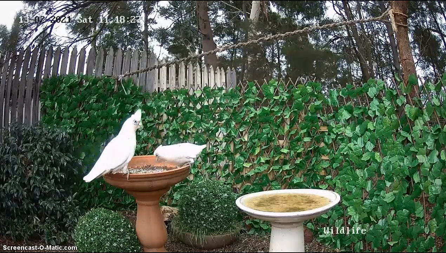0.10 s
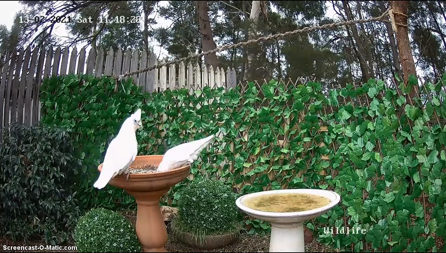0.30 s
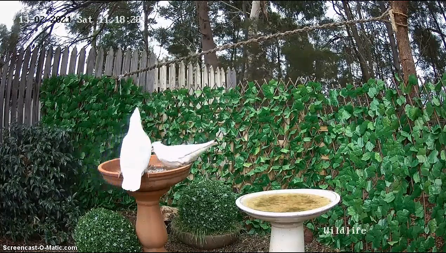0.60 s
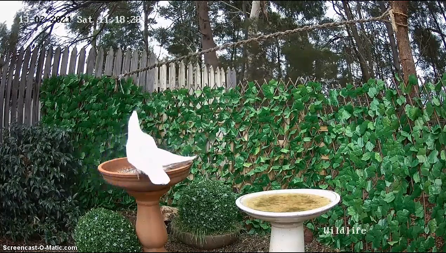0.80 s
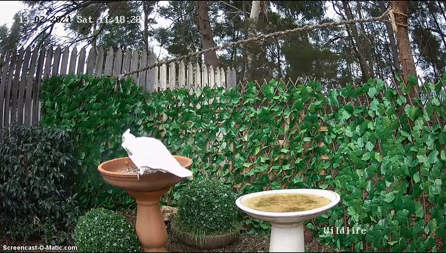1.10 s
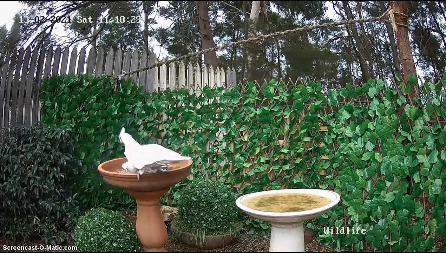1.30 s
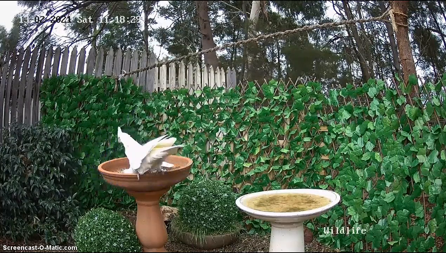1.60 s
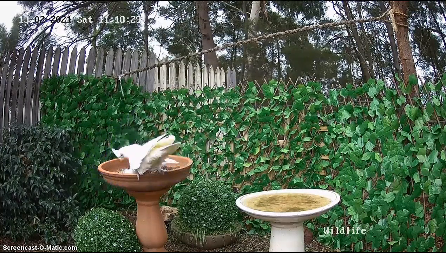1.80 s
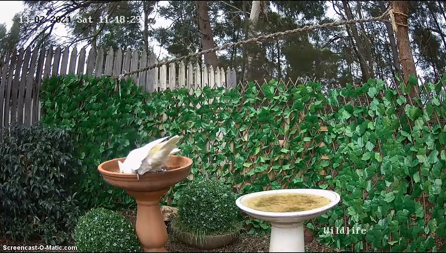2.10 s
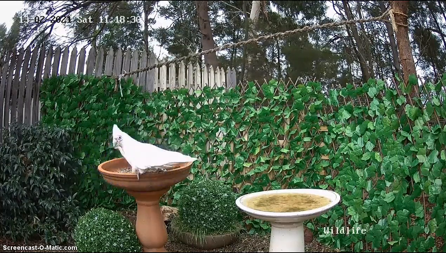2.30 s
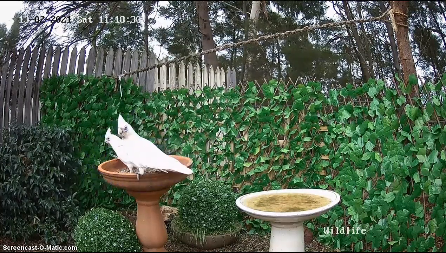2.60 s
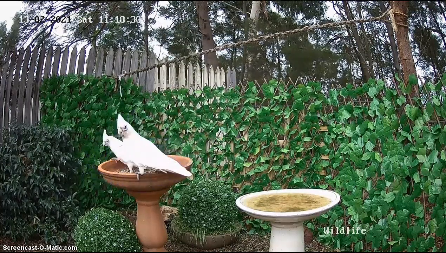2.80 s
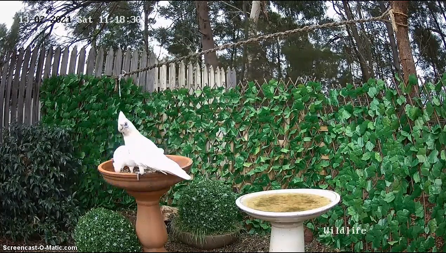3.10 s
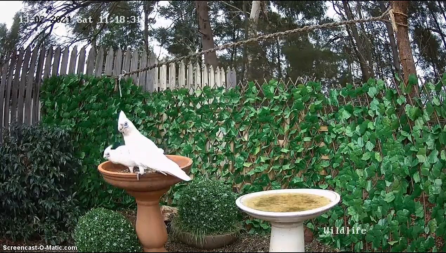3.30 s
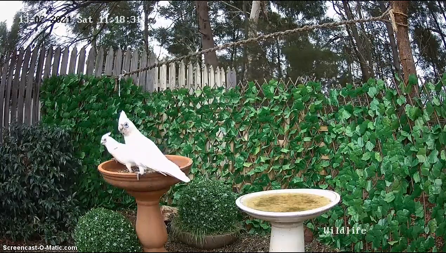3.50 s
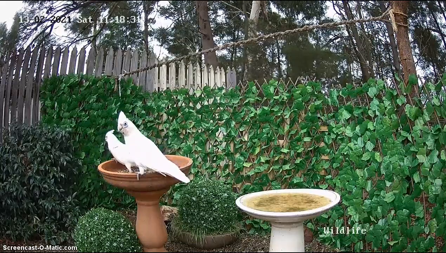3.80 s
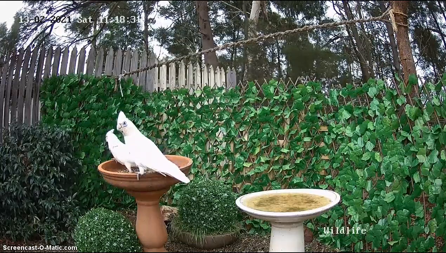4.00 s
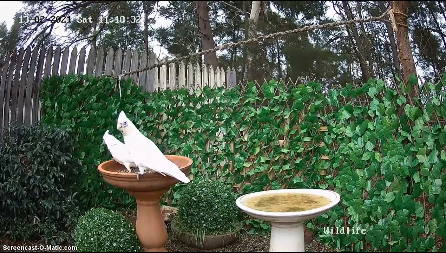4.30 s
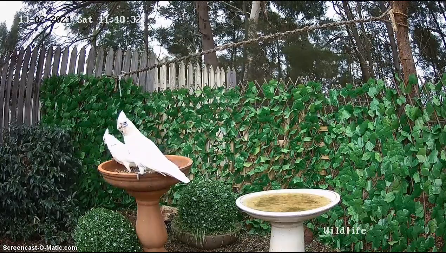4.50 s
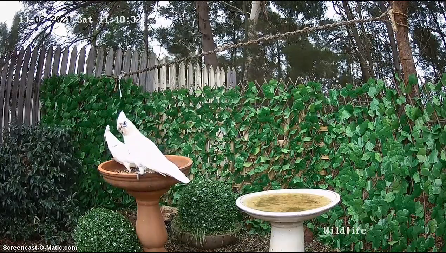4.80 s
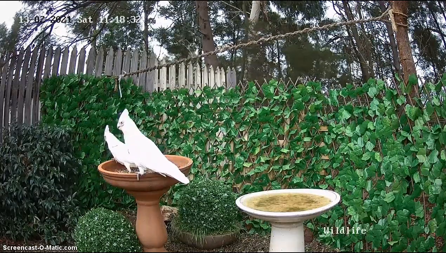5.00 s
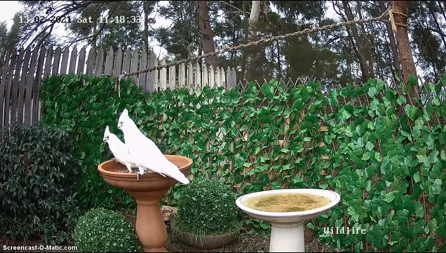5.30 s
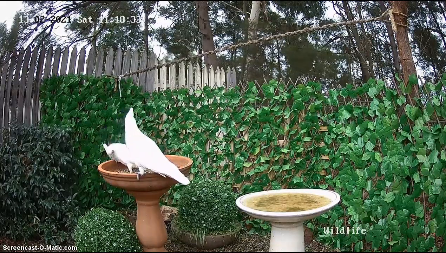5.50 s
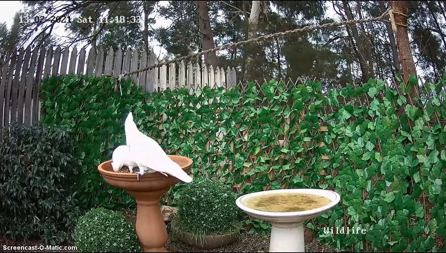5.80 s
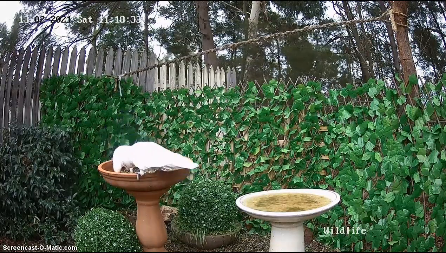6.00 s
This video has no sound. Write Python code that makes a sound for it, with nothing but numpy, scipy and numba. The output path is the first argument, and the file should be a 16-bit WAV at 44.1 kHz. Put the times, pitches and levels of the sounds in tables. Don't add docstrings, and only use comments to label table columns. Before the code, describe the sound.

Garden birds heard through a small tinny loudspeaker: two-note whistles, faint peeps and a single rasping cockatoo scream, with room hum and hiss.

```python
import sys
import numpy as np
from scipy import signal
from scipy.fft import rfft, irfft
from scipy.io import wavfile
from scipy.ndimage import uniform_filter1d
from numba import njit

SR = 44100
rng = np.random.default_rng(int(sys.argv[2]) if len(sys.argv) > 2 else 0)


def undo_db(level):
    steps = np.asarray(level, float) / 20
    return 10 ** steps


def dump(signal):
    limited = np.clip(np.atleast_2d(signal).T, -1, 1)
    pcm = np.round(limited * 32767).astype(np.int16)
    wavfile.write(sys.argv[1], SR, pcm)


N = 272979

# [t/s, f/Hz, first partial level/dB, third partial level/dB]
LOCKED_VOICE = [(2.08, 728, -60, -81), (2.09, 767.1, -47.5, -45), (2.132, 790.0, -50, -26),
                (2.164, 785, -30, -25.5), (2.198, 778.3, -30, -22), (2.23, 774, -35.5, -26)]
# [multiple of f, level under the third/dB, share that follows the first]
OTHER_PARTIALS = [(2, -3.5, 0.3), (4, -5, 0.063), (5, -8, 0.27)]
# [t/s, half length/s, level/dB]
RELAPSES = [(2.223, 0.0045, 0), (2.238, 0.0069, -3.5), (2.264, 0.0057, -15), (2.304, 0.0028, -6.5)]


def locked_voice():
    out = np.zeros(N)
    last_s, *last_row = LOCKED_VOICE[-1]
    i, (hz, first_db, third_db) = curve(LOCKED_VOICE + [(2.32, *last_row)])
    t = i / SR
    gate = np.clip((last_s - t) / 0.036, 0, 1)
    for s, half, db in RELAPSES:
        gate = gate + undo_db(db) * np.exp(-((t - s) / half) ** 2)
    phase = 2 * np.pi * np.cumsum(hz * (1 + 0.0073 * walk(150, len(i)))) / SR
    stack = undo_db(first_db) * np.sin(phase) + undo_db(third_db) * np.sin(3 * phase)
    for k, db, share in OTHER_PARTIALS:
        partial_db = third_db + db + share * (first_db - third_db)
        stack += undo_db(partial_db) * np.sin(round(k) * phase + k ** 2)
    out[i] = np.sqrt(2) * gate * stack
    return out


# [t/s, level/dB, beak opening as treble level/dB, whine against the level/dB]
HARSH_VOICE = [(2.066, -44.5, -9, -15), (2.11, -33, 4.5, -8), (2.125, -47.5, -8.5, -6),
               (2.215, -24.5, -5.5, -10.5), (2.27, -25, 1, -3), (2.45, -24, -2, -4),
               (2.58, -27.5, 2.5, -11), (2.65, -34, -2.5, -16), (2.7, -48.5, -6.5, -28)]
# [f/Hz, width/Hz, level/dB]
THROAT = [(420, 250, -26), (748, 61, -15.5), (1091, 17, -12.5), (1337, 33, -12.5), (1604, 55, -11.5),
          (1806, 70, -12.5), (2342, 42, -5), (2580, 35, -4), (3030, 140, -15), (3569, 48, 0),
          (4000, 42, -14)]
# [f/Hz, level per Hz/dB]
HARSH_BED = [(88, -63.5), (150, -18), (659, -19.5), (738, -7), (941, -20.5), (1570, -36.5), (1940, -16.5),
             (2340, -7.5), (2730, -10), (3530, -4), (4500, -34.5), (5850, -62), (9900, -120)]


def harsh_voice():
    out = np.zeros(N)
    i, (db, open_db, whine_db) = curve(HARSH_VOICE)
    db = db - 12 * np.exp(-(i - i[0]) / (.003 * SR))
    whine_hz = 3598 - 79.7 / 2 * (1 + np.tanh((i / SR - 2.49) / 0.038))
    chance = rng.standard_normal((len(i) // 20, 2)).T
    spread = .1 * undo_db(6 * walk(SR / 12, len(chance[0])))
    at = np.cumsum(SR / 745 * np.exp(chance[0] * spread))
    size = undo_db(2.4 * chance[1] + 1.7 * (-1) ** np.arange(len(at)))
    inside = at < len(i)
    slaps = np.bincount(at[inside].astype(int), size[inside], len(i))
    breath = .5 * rng.standard_normal(len(i))
    drive = (level(slaps - slaps.mean(), 0) + breath) * undo_db(0.66 * walk(120, len(i)))
    voice = level(modes(drive, THROAT), 0) + level(colour(drive, HARSH_BED), -6.5)
    treble = svf(voice, 3500., 1500.)
    opened = level(voice + (undo_db(open_db) - 1) * treble, 0)
    out[i] = undo_db(db) * opened + whine(whine_hz, db + whine_db)
    return out


def whine(hz, db, throb_hz=155, depth=0.6):
    size = len(hz)
    throb = 2 * np.pi * np.cumsum(throb_hz * (1 + .12 * walk(40, size))) / SR
    phase = 2 * np.pi * np.cumsum(hz * (1 + .006 * walk(200, size))) / SR
    lower = depth * undo_db(3.6 * walk(50, size)) * np.sin(phase - throb)
    upper = 0.26 * np.sin(phase + throb)
    return np.sqrt(2) * undo_db(db + 3.2 * walk(70, size)) * (np.sin(phase) + lower + upper)


def screech():
    return locked_voice() + harsh_voice()


def whistle(long, short):
    s, length, hz, db, falter_db = long
    keen = int(short[4] > 0)
    scoop_hz, scoop_s, attack_s, attack_db = 86, 0.0288, 0.0078, -3
    sag_hz = (45.5, 63.7)[keen]
    flick_hz, flick_s, flick_db = (125, 312)[keen], (.018, .027)[keen], (-17, -12)[keen]
    falter_hz = 4 * falter_db
    end = s + length
    rows = [(s, hz - scoop_hz, db - falter_db + attack_db),
            (s + attack_s, hz - 0.76 * scoop_hz, db - 0.83 * falter_db),
            (s + scoop_s, hz - 0.17 * scoop_hz, db - 0.32 * falter_db),
            (s + 0.51 * length, hz - falter_hz, db - falter_db),
            (s + .8 * length, hz - .4 * sag_hz, db - 0.16 * falter_db),
            (end, hz - sag_hz + 1.3 * falter_hz, db),
            (end + flick_s / 2, hz + 0.74 * flick_hz, db - .3 * abs(falter_db)),
            (end + flick_s, hz + flick_hz, db + flick_db)]
    long_rows = []
    for at, f, row_db in rows:
        second_db = row_db + (-16, -12)[keen] - 2 * ((at - s) / length - .5)
        second_db += .6 * falter_db if at <= end else -3
        long_rows.append((at, f, row_db, second_db))

    s, length, hz, db, bend_hz = short
    start_db = db - (0, 5)[keen]
    end = s + length
    rows = [(s, hz, start_db + attack_db),
            (s + attack_s / 2, hz, start_db),
            (s + 0.56 * length, hz + (.5 + keen / 2) * bend_hz, db),
            (end, hz + bend_hz, db),
            (end + .015, hz + bend_hz - 170, db - 25)]
    short_rows = [(*row, row[2] + (-32, -19)[keen]) for row in rows]
    return song(long_rows, flutter_db=.8, broken_db=4) + song(short_rows, flutter_db=.4, broken_db=5)


# [t/s, length/s, f/Hz, level/dB, falter midway/dB]
LONG_NOTES = [(-.06, 0.13, 1430, -43.5, 0), (0.568, .116, 1417, -40.5, -2), (2.842, 0.093, 1485, -43, 13),
              (5.573, .118, 1448, -41.5, 1)]
# [t/s, length/s, f/Hz, level/dB, bend/Hz]
SHORT_NOTES = [
    (0.108, 0.041, 1531, -32.5, 91),
    (.726, 0.032, 1545, -30, -40),
    (2.979, 0.028, 1622, -35.5, 35),
    (5.73, 0.035, 1578, -34, -50),
]
# [t/s, f/Hz, level/dB]
GLIDE = [(2.583, 1310, -39), (2.622, 1428, -37), (2.643, 1700, -38), (2.661, 1340, -35.5),
         (2.684, 1150, -56), (2.712, 770, -49), (2.724, 560, -68), (2.736, 455, -47), (2.775, 467, -52)]


def near_birds():
    whistles = sum(map(whistle, LONG_NOTES, SHORT_NOTES))
    return tail(whistles + song(GLIDE, flutter_db=1.0, wobble=0.0074), .3, -30)


# [t/s, held/s, f/Hz, level/dB, drops to f/Hz]
SHARP_NOTES = [
    (1.59, 0.016, 4082, -32.5, 2650),
    (1.617, 0.013, 3400, -35, 3080),
    (1.636, .01, 3000, -38, 2360),
]


def sharp():
    out = song([(1.563, 2107, -64), (1.563 + .018, 4300, -34)], flutter_db=2.5, wobble=.01)
    step_db = -17
    for s, held, hz, db, to_hz in SHARP_NOTES:
        end, fall_s = s + held, (hz - to_hz) / 95000
        rows = [(s, .97 * hz, db - 0.5),
                (s + 0.57 * held, hz, db),
                (end, hz, db),
                (end + .6 * fall_s, .4 * hz + 0.61 * to_hz, db + .3 * step_db),
                (end + fall_s, to_hz, db + step_db)]
        out += song(rows, flutter_db=2.5, wobble=.01)
    return out


def chirp(s, held_db, tail_db, tail_s):
    lead_hz, held_hz, tail_hz = 3770, 3400, 2280
    lead_s, held_s, fall_s = .05, .022, .022
    lead_db = held_db - 10
    rows = [(s - held_s - lead_s, lead_hz, lead_db),
            (s - 1.86 * held_s, (lead_hz + held_hz) / 2, lead_db),
            (s - held_s, held_hz, held_db),
            (s, held_hz, held_db),
            (s + .4 * fall_s, 1.2 * tail_hz, tail_db + 1),
            (s + fall_s, 1.04 * tail_hz, tail_db),
            (s + fall_s + tail_s / 3, tail_hz, tail_db),
            (s + fall_s + tail_s, .97 * tail_hz, tail_db - 4)]
    return song(rows, flutter_db=3.5)


def peep(s, db, hz):
    rows = [(s - .006, hz, db - 16), (s + .004, hz, db - 5), (s + .018, .99 * hz, db - 17)]
    return song(rows, wobble=.01)


def faint_note(s, length, hz, db):
    rows = [(s, hz, db), (s + length / 2, hz, db), (s + length, hz, db + 1)]
    return song(rows, flutter_db=3.5, wobble=0.032)


# [drop t/s, held level/dB, tail level/dB, tail/s]
CHIRPS = [
    (5.028, -52.5, -54.5, 0.0084),
    (5.435, -51, -56, .05),
    (6.137, -72, -58.5, 0.066),
]
# [t/s, peak level/dB, f/Hz]
PEEPS = [(0.5077, -54, 3425), (0.847, -49.5, 3000), (1.3319, -36, 3458), (1.3865, -54, 3400),
         (1.476, -38.5, 3000), (1.7894, -62.5, 3400), (4.8544, -54, 2710), (4.875, -43, 2603),
         (5.2315, -50, 2590), (5.254, -44, 2580), (5.2758, -47.5, 2670)]
# [t/s, length/s, f/Hz, level/dB]
FAINT_NOTES = [(3.979, 0.12, 2700, -67), (4.48, .1, 2700, -68), (4.82, .08, 2260, -64.5),
               (5.222, 0.084, 2280, -61)]


def far_birds():
    far = sharp()
    for play, table in ((chirp, CHIRPS), (faint_note, FAINT_NOTES), (peep, PEEPS)):
        far = far + sum(play(*row) for row in table)
    far = far + 0.4 * np.roll(far, int(.0045 * SR)) + 0.19 * np.roll(far, int(0.029 * SR))
    return tail(far, .5, -14)


# [t/s, peak level/dB, low part level/dB]
TICKS = [(0.0517, -44, -16), (0.0652, -36, 2), (0.7542, -43.5, 2), (0.847, -43, 3), (1.3142, -44, -19),
         (1.5569, -41, -31), (2.9931, -37.5, -13), (3.026, -43.5, -8), (3.3855, -46, -7), (3.5029, -54, -5),
         (3.8357, -36.5, -5), (4.127, -44, -15), (4.1705, -50, -9), (4.1929, -50, -7), (5.1746, -41, -23),
         (5.4594, -38, -8), (5.678, -45, -1), (5.8002, -40.5, 5), (5.9544, -49, -4)]


def ticks():
    out, t = np.zeros(N + 2000), np.arange(2000) / SR
    for s, db, low_db in TICKS:
        crack = modes(rng.standard_normal(len(t)) * np.exp(-t / 0.0039), SPEAKER)
        crack = colour(crack, [(900, low_db - 23), (1600, low_db), (2700, 0), (4400, 0)])
        start = int(s * SR)
        out[start:start + len(t)] += undo_db(db) * crack / np.abs(crack).max()
    return tail(out[:N], 0.29, -9.5)


# [t/s, half length/s, level/dB]
GUSTS = [(0, 0.16, -61), (.85, 0.35, -67), (1.39, .05, -61), (1.47, 0.033, -58), (1.6, 0.12, -58.5),
         (2.7, 0.16, -53), (5.15, 0.66, -60.5), (6, .4, -69)]


def leaves():
    grains = rng.standard_normal(N) * undo_db(1.5 * walk(60, N))
    return swells(-68, GUSTS) * level(modes(grains, SPEAKER[1:]), 0)


# [t/s, half length/s, level/dB]
PASSES = [
    (2.7, 0.28, -70),
    (5.05, 0.61, -59.5),
]


def traffic():
    rumble = svf(svf(rng.standard_normal(N), 1684.0, 350.0), 1684.0, 350.0)
    return swells(-67.5, PASSES) * level(rumble, 0)


# [f/Hz, width/Hz, level/dB]
SPEAKER = [(1680, 210, 2.5), (2292, 110, -0.5), (2650, 130, -4.5), (3000, 69, 4), (3466, 266, 2.5),
           (3850, 840, -4)]


def tail(x, t60, db):
    t = np.arange(SR // 2) / SR
    noise = rng.standard_normal(len(t))
    echo = (noise + modes(noise, SPEAKER)) * undo_db(-60 * t / t60) * np.minimum(t / .02, 1)
    return x + signal.fftconvolve(x, echo * undo_db(db) / np.linalg.norm(echo))[:N]


def camera(yard):
    camera_hz = 8000
    leak = [(20, 1.0), (3700, -1.5), (4000, -3), (4300, -10.0),
            (4480, -40), (4560, -82), (20000, -86.5)]
    mirror = 2 * np.cos(2 * np.pi * camera_hz * np.arange(N) / SR)
    rounded = np.tanh(3.51 * yard) / 3.515
    taken = signal.sosfilt(signal.butter(10, 4200, fs=SR, output="sos"), rounded)
    return colour(taken * (1 + mirror), leak)


# [t/s, half length/s, level/dB, low part level/dB]
STROKES = [(0, .04, -77.5, -6), (.45, .4, -85, 4), (1.64, 0.19, -71, -1.5), (2.034, 0.076, -66, -7),
           (2.15, 0.069, -68, 1), (2.447, 0.16, -66.5, -3.5), (2.704, 0.088, -68, -5), (2.93, .07, -66, -4),
           (3.16, .08, -69.5, -5), (3.414, 0.078, -67, -2.5), (3.68, .08, -71.5, -7),
           (3.888, .05, -66.5, -9), (4.12, 0.077, -66, -4.5), (4.51, 0.21, -66.5, 1)]


def desk():
    resting_db = -91
    fine = rng.standard_normal((2, N)) * undo_db(0.97 * walk(300, N))
    high = level(svf(svf(fine[0], 9900., 4500.), 9900., 4500.), 0)
    low = level(svf(svf(fine[1], 5900., 4000.), 5900., 4000.), 0)
    high_strokes = [(s, half, db) for s, half, db, low_db in STROKES]
    low_strokes = [(s, half, db + low_db) for s, half, db, low_db in STROKES]
    return swells(resting_db, high_strokes) * high + swells(resting_db + 2.5, low_strokes) * low


# [f/Hz, width/Hz, level/dB]
FAN = [(112.7, 17.6, -57), (208.2, 13, -59.5), (467, 15, -64.5), (621, 15, -68.5), (790, 84, -64)]


def fan():
    hum = np.zeros(N)
    for hz, width, db in FAN:
        band = svf(rng.standard_normal(N), 1. * hz, 1. * width)
        hum += level(band * undo_db(1.4 * walk(3.016, N)), db)
    motor_hz = 122.8 * (1 + 0.0193 * walk(6, N))
    motor = np.sin(2 * np.pi * np.cumsum(motor_hz) / SR) * undo_db(1.6 * walk(4, N))
    return hum + level(motor, -56.5)


# [f/Hz, level per Hz/dB]
ROOM_AIR = [(12, -36.5), (20, -3.5), (85, -7.5), (112, -12.5), (202, -4), (245, -17.5), (282, -8.5),
            (520, -20), (632, -14), (883, -23.5), (960, -18.5), (1420, -24), (1630, -24), (2040, -33),
            (15600, -41.5)]


def room_air():
    air = colour(rng.standard_normal(N), ROOM_AIR)
    t = np.arange(N) / SR
    lull_db = -4.5 * np.exp(-((t - 1.9) / 0.97) ** 2)
    draught_db = -0.5 + .5 * t + lull_db
    air = air + (undo_db(draught_db) - 1) * svf(air, 770.0, 1100.)
    for hz in 60 * 2. ** np.arange(5):
        air = air + (undo_db(.9 * walk(4, N)) - 1) * svf(air, hz, .7 * hz)
    return level(air, -49.5 - 2.5)


def song(table, flutter_db=5.0, wobble=0.004, broken_db=1):
    out = np.zeros(N)
    i, (hz, db, *second_db) = curve(table)
    phase = 2 * np.pi * np.cumsum(hz * (1 + wobble * walk(150, len(i)))) / SR
    tone = undo_db(db) * np.sin(phase)
    broken = walk(70.7, len(i))
    for d in second_db:
        third = undo_db(-7) * np.sin(3 * phase) * (hz < 1430)
        tone += undo_db(d + broken_db * (broken - broken.mean())) * (np.sin(2 * phase) + third)
    count = np.arange(len(i))
    edge = np.minimum(np.minimum(count, count[::-1]) / (.002 * SR), 1)
    flutter = walk(91, len(i))
    out[i] = np.sqrt(2) * tone * edge * undo_db(flutter_db * (flutter - flutter.mean()))
    return out


def swells(rest_db, table):
    t = np.arange(N) / SR
    power = undo_db(rest_db) ** 2
    for s, half, db in table:
        power = power + (undo_db(db) * np.exp(-((t - s) / half) ** 2)) ** 2
    return np.sqrt(power)


def level(x, db):
    return x * undo_db(db) / np.sqrt(np.mean(x ** 2))


def curve(table):
    s, *columns = np.transpose(table)
    i = np.arange(max(int(s[0] * SR), 0), min(int(s[-1] * SR), N))
    return i, [np.interp(i / SR, s, c) for c in columns]


@njit
def svf(x, hz, width):
    y, b, l = np.empty(len(x)), 0., 0.
    g, k = np.tan(np.pi * hz / SR), width / hz
    for i in range(len(x)):
        v = (b + g * (x[i] - l)) / (1 + g * (g + k))
        b, l, y[i] = 2 * v - b, l + 2 * g * v, k * v
    return y


def modes(x, table):
    return sum((-1) ** k * undo_db(db) * svf(x, 1. * hz, 1. * width) for k, (hz, width, db) in enumerate(table))


def colour(x, spectrum):
    hz, db = np.transpose(spectrum)
    f = np.arange(len(x) // 2 + 1) * SR / len(x) + 1
    return irfft(rfft(x) * undo_db(np.interp(np.log(f), np.log(hz), db)), len(x))


def walk(rate, size):
    k = max(int(SR / rate), 1)
    held = np.repeat(rng.standard_normal(size // k + 1), k)
    return 1.35 * uniform_filter1d(uniform_filter1d(held, k), k)[:size]


def scene():
    yard = tail(screech(), 0.53, -18.5) + near_birds() + far_birds() + ticks() + leaves() + traffic()
    return (camera(yard) + desk() + fan() + room_air())[None]


def low_pass(x):
    return signal.sosfilt(signal.butter(12, 15700, fs=SR, output="sos"), x)


def record(dry):
    return low_pass(dry)


dry = scene()
out = record(dry)
dump(out)
```